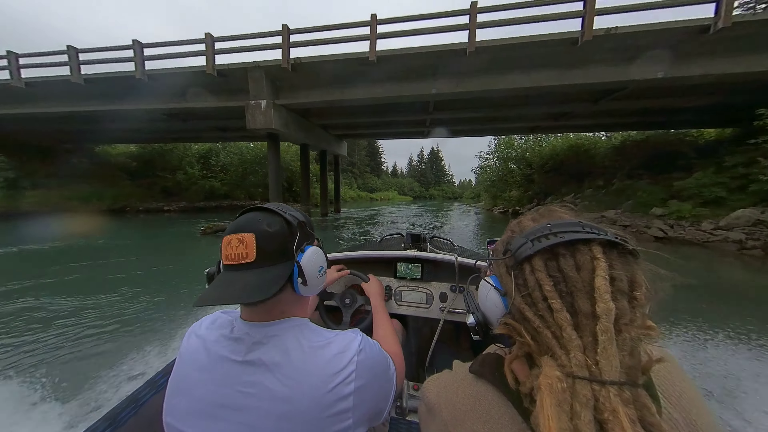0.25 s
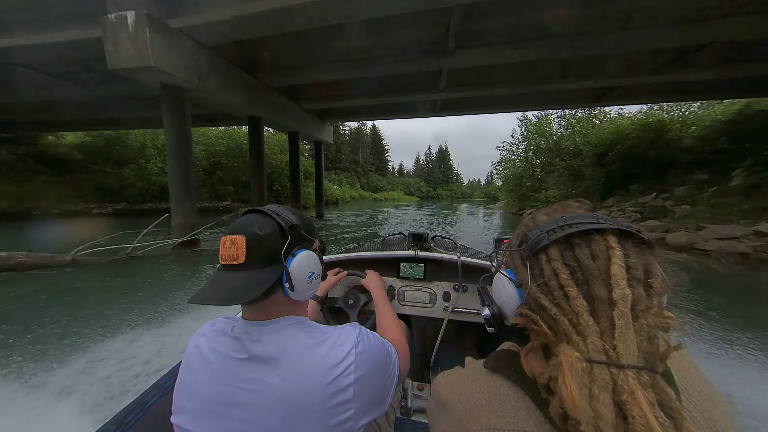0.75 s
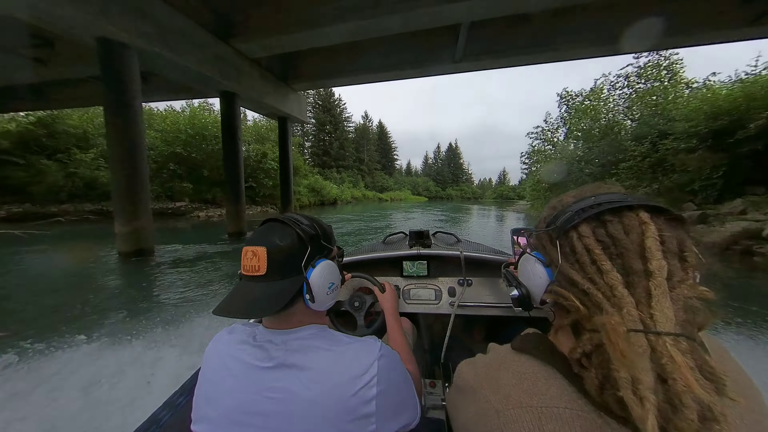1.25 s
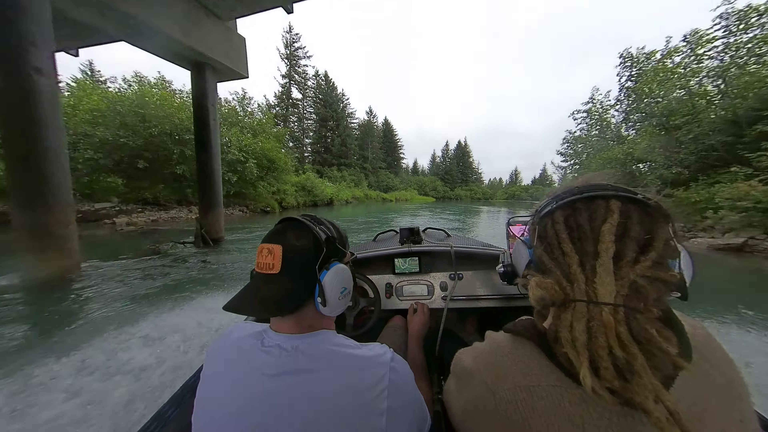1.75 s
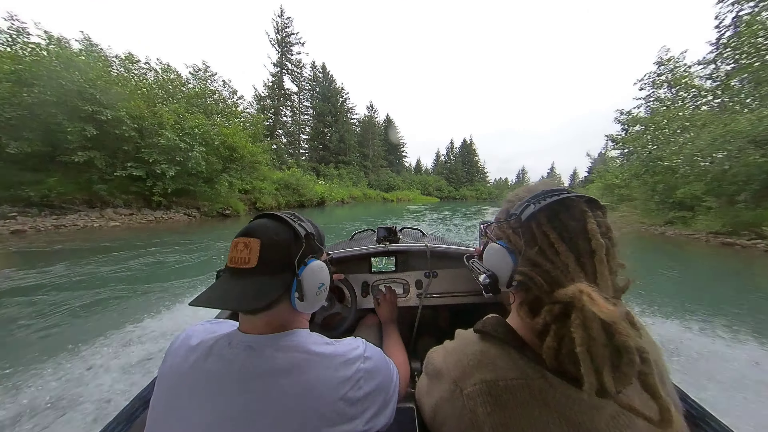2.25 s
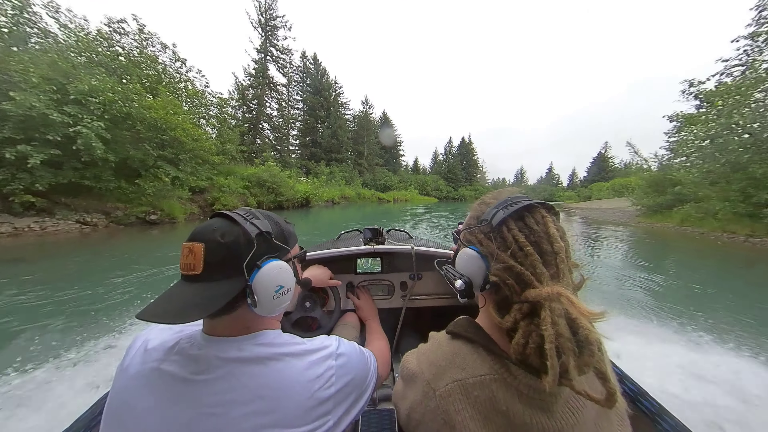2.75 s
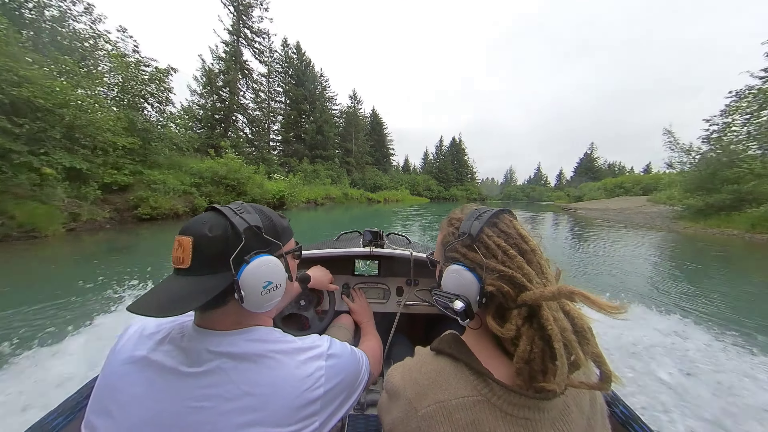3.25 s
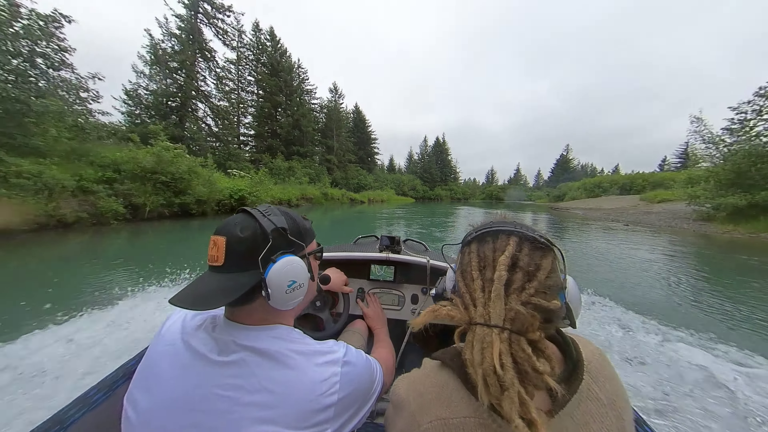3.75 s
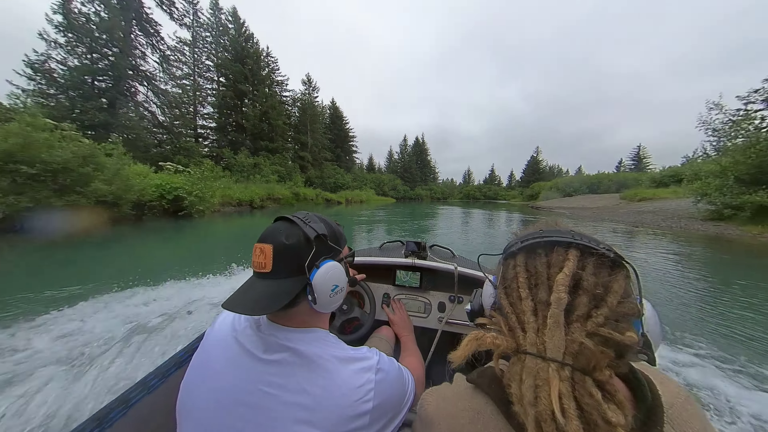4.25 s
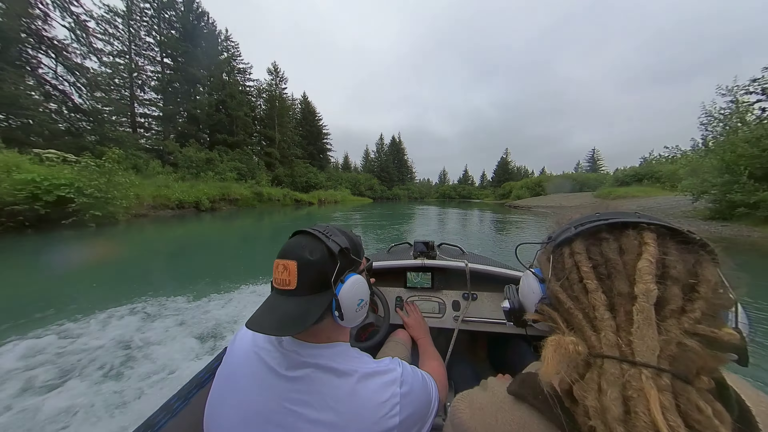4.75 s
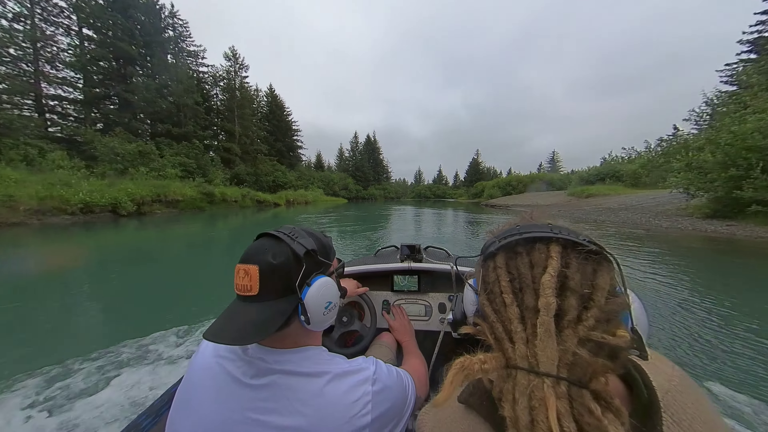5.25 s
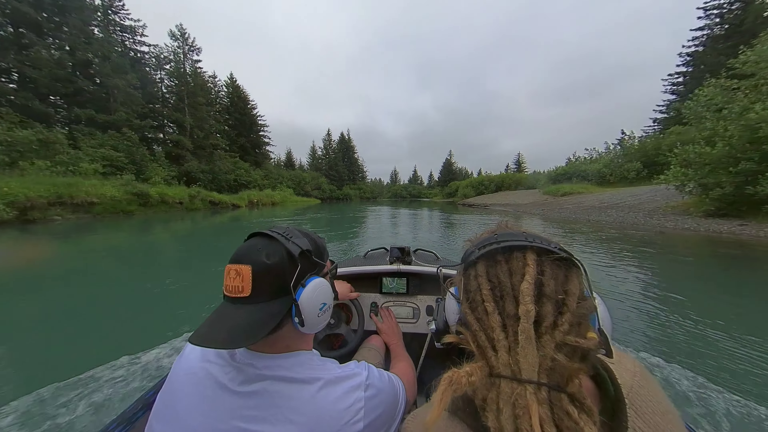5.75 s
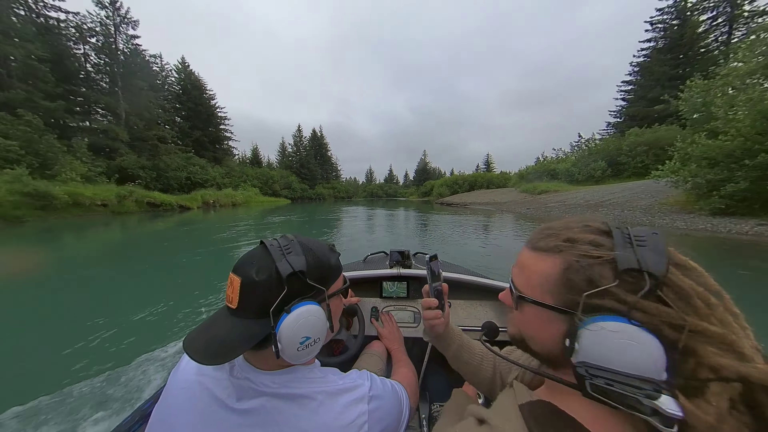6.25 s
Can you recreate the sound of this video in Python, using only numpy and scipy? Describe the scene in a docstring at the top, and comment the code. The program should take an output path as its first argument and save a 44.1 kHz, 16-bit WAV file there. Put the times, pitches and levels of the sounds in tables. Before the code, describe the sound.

On board a small open jet boat at speed on a river, with the microphone behind the seats in the wind. A deep engine drone, around 130 firings a second, runs throughout, with raspy vibrating hull panels, a thin wavering whine from the drive, broad rushing wash and fine hissing spray. From 0 to 0.6 s the pitch sags slightly, and low wind buffeting brings thumps and a cluster of short crackles. More pops come at about 1.0, 1.1, 1.3 to 1.4 and 1.9 s, while the drone flutters and dips. Dull, hard pops strike around 3.1 and 3.25 s. From 3.8 to 4.6 s the engine rises a little, overtones brighten, the jet churns in brief surges and a very faint, high whistle emerges. Afterwards the pitch eases down until about 5.8 s, the spray fades and coarsens, wind calms, and the motor lifts slightly at the end, 6.5 s.

```python
"""Aboard a small jet boat on a river

The microphone rides behind the seats while the boat runs upriver in wind.
The four-cylinder engine is a sine drone with overtones; knocks and gas puffs ring hull panels as a rasp.
The drive whines, as noise and a tone; filtered noise makes the jet's wash, its surges and the spray.
Shaped noise makes wind, thumps and crackles on the microphone; a wavering sine whistles thinly far above."""
import sys
import numpy as np
from scipy import signal
from scipy.fft import rfft, irfft, next_fast_len
from scipy.io import wavfile
from scipy.ndimage import uniform_filter1d, map_coordinates

SR = 44100
rng = np.random.default_rng(int(sys.argv[2]) if len(sys.argv) > 2 else 0)


def store_wav(level_fs):
    """Save 16-bit WAV to argv[1]."""
    pcm = np.round(np.clip(np.atleast_2d(level_fs), -1, 1) * 32767)
    wavfile.write(sys.argv[1], SR, pcm.T.astype(np.int16))


N = 286650

# All table levels are relative; each source adds its own trim.
# engine speed before slight hunting: (time [s], firing rate [Hz])
ENGINE_SPEED = [(0.0, 140.3), (0.17, 141.3), (0.3, 139.6), (0.62, 131), (1.12, 128.7), (1.75, 130.5),
                (1.92, 127.9), (2.45, 127.3), (2.64, 124.5), (2.9, 127.7), (3.45, 126.5), (3.75, 128.7),
                (4.1, 134.9), (4.36, 136), (4.8, 132), (5.02, 128.6), (5.25, 127.7), (5.5, 124.3),
                (5.62, 120.8), (5.84, 119.4), (6.08, 120.3), (6.5, 125.1)]
# exhaust drone at the firing rate: (time [s], level [dB])
DRONE_LEVEL = [(0.0, -21), (0.2, -24), (0.38, -20.5), (0.6, -24.5), (0.72, -17), (1.1, -18), (1.7, -19.5),
               (2.04, -19), (2.2, -16), (2.5, -18), (2.75, -19.5), (3.1, -18.5), (3.3, -16), (3.72, -16.5),
               (3.88, -19.5), (4.5, -18), (5.12, -17), (5.9, -16), (6.22, -17), (6.45, -15)]
# brief deep dips of the drone: (time [s], depth [dB])
DRONE_DIPS = [(0.28, 3.5), (0.54, 19), (1.29, 9), (1.877, 2), (2.02, 7), (2.46, 8), (3.04, 0), (3.13, 4.5),
              (3.62, 2), (4.03, 3.5), (4.23, 4), (4.64, 4.5), (4.76, 4.5), (5.56, 3)]
# exhaust overtones above the wake: (time [s], level [dB])
OVERTONE_LEVEL = [(0.0, -47), (0.7, -39.5), (1.1, -44.5), (1.4, -40), (1.6, -45), (2.2, -43.5), (2.86, -42),
                  (3.15, -47.5), (3.63, -41.5), (3.95, -37), (4.3, -37.5), (4.85, -34.5), (5.17, -39.5),
                  (5.39, -36), (5.8, -39.5), (6.49, -42.5)]
# exhaust lines before the hull colours them: (multiple of the crank rate [1], level [dB])
CRANK_ORDERS = [(3, -1.5), (5, -4), (7, -20), (8, -2), (9, -2), (10, -1), (11, -10), (12, -9), (14, -10),
                (15, -11), (16, -12), (17, -14), (18, -10), (19, -12), (20, -14), (21, -26)]
# second harmonic of the firing: (time [s], level [dB])
SECOND_LEVEL = [(0, -48), (0.8, -43), (1.1, -45.5), (1.7, -48), (2.2, -46.5), (2.8, -44), (3.2, -47),
                (3.4, -52), (3.7, -45), (4.0, -44), (4.16, -33), (4.6, -42), (4.8, -49), (4.95, -39),
                (5.25, -48), (5.6, -37), (6.3, -40.5), (6.45, -52)]
# third harmonic of the firing: (time [s], level [dB])
THIRD_LEVEL = [(0, -51), (1.0, -53), (2.0, -49), (2.25, -40), (2.4, -44), (2.6, -44), (2.85, -39),
               (3.05, -49), (3.45, -54), (3.7, -39.5), (3.92, -43), (4.15, -46), (4.39, -36.5),
               (4.52, -35.5), (4.6, -51), (4.9, -37), (5.1, -45.5), (5.35, -37), (5.55, -43), (5.72, -38),
               (6.15, -39.5), (6.4, -43)]
# engine load, heard as the rasp of the hull: (time [s], level [dB])
ENGINE_LOAD = [(0.0, -38.5), (0.3, -47.5), (0.42, -43), (0.85, -45.5), (1.45, -43.5), (1.8, -44.5),
               (2.3, -43), (2.8, -42), (2.98, -41), (3.14, -45), (3.55, -43), (3.82, -40.5), (3.96, -38.5),
               (4.3, -38.5), (4.52, -37.5), (4.62, -40), (4.9, -40.5), (5.2, -42.5), (5.4, -40),
               (5.78, -45.5), (6.1, -47), (6.3, -42.5), (6.5, -47.5)]
# hull and engine cover resonances: (centre [Hz], width [Hz], level [dB])
HULL_PANELS = [(182, 21.4, -2), (264, 40, -4), (321, 30, -3), (368, 38, -2), (523, 30, 1), (578, 42, -2.5),
               (660, 38, -4.5), (788, 48, -9.5), (1014.6, 40, -5.5), (1064, 30, -12), (1140, 44, -10),
               (1258, 48, -9), (1502, 63, -10), (1636, 79, -15), (1739, 67, -15), (1878, 63, -18),
               (2175, 100, -15.5), (2556, 110, -22.5), (2750, 90, -27), (2935, 130, -26.5),
               (3910, 130, -35.5)]
# whine of the drive: (time [s], level [dB])
WHINE_LEVEL = [(0, -50), (0.1, -41), (0.2, -51), (0.36, -43.5), (0.45, -50), (0.66, -46), (0.75, -53),
               (0.86, -47), (1.15, -46.5), (1.6, -43), (1.95, -51), (2.15, -46), (2.36, -42.5),
               (2.45, -47.5), (2.7, -49), (2.84, -44.5), (3.0, -42), (3.06, -51), (3.6, -50.5), (3.9, -45),
               (4.05, -39.5), (4.35, -45), (4.5, -39.5), (4.62, -46), (5.0, -42.5), (5.15, -48.5),
               (5.38, -41.5), (5.7, -52), (6.5, -52.5)]
# wind buffeting the microphone: (time [s], level [dB])
WIND_LEVEL = [(0.0, -28.5), (0.24, -29.5), (0.34, -34.5), (0.45, -30.5), (0.64, -28.5), (0.8, -34),
              (1.02, -30), (1.22, -32), (1.36, -30), (1.78, -31), (1.98, -33), (2.08, -42), (2.22, -35),
              (2.55, -34.5), (2.68, -35), (2.78, -41), (2.92, -31), (3.18, -29.5), (3.42, -44), (3.6, -34),
              (3.78, -39.5), (3.97, -34), (4.25, -35), (4.6, -36), (5.1, -35), (5.5, -41.5), (5.85, -37.5),
              (6.08, -45.5), (6.5, -47)]
# colour of the buffeting: (frequency [Hz], density [dB per Hz])
BUFFET_COLOUR = [(12, -26.5), (25, -15.5), (45, -0.5), (70, 3), (110, 4), (170, -2.5), (230, -14),
                 (400, -17), (800, -33.5), (2000, -41.5), (5000, -73)]
# hiss of water thrown off the hull: (time [s], level [dB])
SPRAY_LEVEL = [(0.0, -47), (0.14, -50.5), (0.28, -53), (0.4, -48), (0.86, -52), (1.3, -49), (1.42, -48.5),
               (1.55, -48), (1.74, -49), (1.81, -52.5), (1.88, -49.5), (2.1, -46), (2.4, -47.5),
               (2.55, -45), (2.68, -49), (2.8, -45), (3.0, -47), (3.05, -52), (3.58, -51.5), (3.94, -47.5),
               (4.52, -50), (4.58, -54.5), (4.9, -53), (5.08, -58), (5.35, -55), (5.7, -58), (6.12, -59),
               (6.26, -55), (6.5, -60.5)]
# the spray coarsens as the boat turns: (time [s], share of fine spray [0-1])
FINE_SPRAY_SHARE = [(0, 0.97), (3.7, 0.87), (4.5, 0.5), (5.1, 0.3), (6.5, 0)]
# colour of the jet and wake: (frequency [Hz], density [dB per Hz])
WASH_COLOUR = [(100, -17), (200, -3.5), (330, -1.5), (450, -10.5), (640, -3), (790, -9), (890, -17),
               (1050, -10), (1200, -9.5), (1390, -14), (1750, -14), (2000, -20), (2500, -22), (3200, -28),
               (5000, -31.5), (8000, -35.5), (15000, -40)]
# colour of fine spray: (frequency [Hz], density [dB per Hz])
FINE_COLOUR = [(1500, -35), (3500, -12.5), (5000, -7), (6800, -5.5), (8000, -7), (10500, -5), (12000, -1.6),
               (13200, 1), (14200, -3), (15600, -5)]
# colour of coarse spray: (frequency [Hz], density [dB per Hz])
COARSE_COLOUR = [(1500, -30), (3000, -7), (4100, -3), (5000, -7), (6000, -5), (8000, -10.5), (9300, -5.5),
                 (10500, -3.5), (12000, 0), (13200, 1), (14200, -5), (15600, -10)]
# thin whistle: (time [s], pitch [Hz], level [dB])
WHISTLE_LINE = [(0, 13500, -76), (3.6, 13700, -68), (4.0, 13250, -65), (4.5, 13210, -61), (4.8, 13100, -61),
                (5.5, 13250, -67), (6.5, 13370, -70)]
# strongest gusts on the microphone: (time [s], level [dB], flap re level [dB])
GUST_THUMPS = [(0.06, -29, -22), (0.17, -28, -22), (0.24, -24.5, -18), (0.43, -26, -6), (0.61, -26.5, -10),
               (0.98, -27, -20), (1.14, -27.5, -25), (1.36, -26, -11), (1.45, -29, -9), (1.59, -27, -16),
               (1.73, -29.5, -6), (1.88, -28, -2.5), (1.99, -30, -4), (2.42, -26.5, -20), (2.6, -29.5, -6),
               (2.67, -26.5, -24), (2.94, -30, -22), (3.04, -29, -23), (3.15, -27.5, -14),
               (3.63, -31.5, -16), (3.93, -29, -11), (4.04, -30.5, -16), (4.51, -35, -12),
               (5.06, -31.5, -16), (5.85, -36, -19), (6.25, -33.5, -21)]
# colour of a flapping eddy: (frequency [Hz], density [dB per Hz])
FLAP_COLOUR = [(90, -19), (170, 1), (260, -4), (380, -7.5), (600, -15), (1500, -39), (4000, -80)]
# crackles on the microphone: (time [s], level [dB], treble re level [dB], body [Hz], rise [s])
GUST_CRACKLES = [(0.179, -27.5, -31, 1290, 0.0045), (0.245, -27.5, -37, 850, 0.0055),
                 (0.269, -33, -28, 1100, 0.0022), (0.354, -22, -38, 600, 0.005),
                 (0.489, -18, -38, 520, 0.0028), (0.503, -26, -33, 800, 0.0055),
                 (0.513, -26, -23, 860, 0.004), (0.527, -34, -22, 600, 0.002),
                 (0.622, -22, -22, 900, 0.003), (0.633, -29, -29, 700, 0.0058),
                 (0.662, -32, -22, 800, 0.002), (0.997, -19, -19.5, 850, 0.0015),
                 (1.144, -22, -28, 1100, 0.0016), (1.322, -21.5, -26, 840, 0.0034),
                 (1.337, -27, -36, 700, 0.0023), (1.398, -25, -24, 700, 0.0016),
                 (1.872, -28, -35, 696, 0.002), (3.060, -15.5, -45, 400, 0.0015),
                 (3.073, -17, -43, 400, 0.0034), (3.246, -18, -42, 600, 0.003)]
# surges of the jet: (time [s], level [dB], half-width [s])
JET_SURGES = [(1.33, -51, 0.035), (2.83, -49.5, 0.1), (3.95, -50, 0.05), (4.12, -47.5, 0.059),
              (4.28, -45.5, 0.05), (4.42, -44.5, 0.04), (4.52, -42, 0.039)]
# colour of those surges: (frequency [Hz], density [dB per Hz])
CHURN_COLOUR = [(400, -32), (800, -7), (880, -10), (1050, 2), (1400, -6), (1780, 0.5), (2020, -11),
                (2300, -11), (3000, -22), (6000, -36)]
# left-right likeness of the noise: (frequency [Hz], coherence [0-1])
STEREO_LIKENESS = [(1500, 1), (2500, 1), (3500, 0.73), (5500, 0.23), (7500, 0.35), (9000, 0.87),
                   (15000, 0.78)]

TOP_HZ = 15680  # band limit
CRUISE_HZ = 130  # cruising firing rate
CRUISE_TILT_DB, TILT_DB_PER_HZ = -1.5, 0.38  # dB per octave at cruise; its growth per Hz of firing rate
# scale of the random dips; knots per second; growth in dB per dB of wind
DIP_DB, DIP_RATE, DIP_GROWS = 1.0, 24, 0.8
DIP_FALL_S, DIP_RECOVER_S = 0.014, 0.032  # half-widths before and after a deep dip's lowest point
WASH_LOAD_SHARE = 0.88  # share of the wash's level from engine load; the rest follows the spray
THUMP_S = 0.024  # half-width of a thump


def amp(db):
    """Decibels to gain."""
    return 10 ** (np.asarray(db) / 20)


def unit(x):
    """Scale to rms 1."""
    return x / np.sqrt(np.mean(x ** 2) + 1e-20)


def along(points, hz):
    """Read (frequency [Hz], value) points on a log frequency axis."""
    f, v = np.transpose(points)
    return np.interp(np.log(hz + 1), np.log(f + 1), v)


def curves(rows):
    """One value per sample for each column after the time."""
    s, *columns = np.transpose(rows)
    return [np.interp(np.arange(N) / SR, s, column) for column in columns]


def wobble(rate):
    """A smooth random curve, rate knots a second."""
    knots = rng.standard_normal(int(N * rate / SR) + 4)
    return map_coordinates(knots, [np.arange(N) * rate / SR])


def filtered(x, response):
    """x times a complex response of frequency."""
    m = next_fast_len(N + SR // 2)
    return irfft(rfft(x, m) * response(np.fft.rfftfreq(m, 1 / SR)), m)[..., :N]


def rush(spectrum):
    """Coloured noise of rms 1: mono up to 2.5 kHz, spread across left and right above."""
    def mid_side(hz):
        turn = np.arccos(np.clip(along(STEREO_LIKENESS, hz), -1, 1)) / 2
        return amp(along(spectrum, hz)) * np.array([np.cos(turn), np.sin(turn)])

    mid, side = filtered(rng.standard_normal((2, N)), mid_side)
    return unit(np.array([mid + side, mid - side]))


def patchy(x, depth_db):
    """Lay smooth random patches of gain over time and frequency."""
    z = signal.stft(x, nperseg=512)[2]
    field = rng.standard_normal(z.shape[1:])
    field = uniform_filter1d(field, size=7, axis=0)
    field = uniform_filter1d(field, size=6, axis=1)
    patched = signal.istft(z * amp(depth_db * unit(field)), nperseg=512)[1]
    return unit(patched[:, :N])


def hull(hz):
    """Summed panel resonances, with alternating sign."""
    total = 0
    for k, (centre, width, db) in enumerate(HULL_PANELS):
        band = 1j * hz * width / (centre * centre - hz * hz + 1j * hz * width)
        total = total + (-1) ** k * amp(db) * band
    return total


def crank_turns(hunt):
    """Turns of the crank so far: two firings a turn, the speed hunting slightly."""
    firing_hz, = curves(ENGINE_SPEED)
    return np.cumsum(firing_hz / 2 * (1 + hunt * wobble(14))) / SR


def drone(turns, level_db, flutter_db):
    """The deep firing tone, a sine: its short random dips deepen with the wind, and deep dips break it."""
    drone_db, = curves(DRONE_LEVEL)
    wind_db, = curves(WIND_LEVEL)
    t = np.arange(N) / SR
    wind_growth = amp(DIP_GROWS * (wind_db - wind_db.mean()))
    dips_db = DIP_DB * wind_growth * np.clip(wobble(DIP_RATE), 0, 2) ** 2
    for s, depth_db in DRONE_DIPS:
        # quick fall, slower recovery
        half_s = np.where(t < s, DIP_FALL_S, DIP_RECOVER_S)
        dips_db = dips_db + depth_db * np.exp(-((t - s) / half_s) ** 2)
    gain = amp(drone_db + level_db - dips_db + flutter_db * wobble(28))
    return np.sqrt(2) * gain * np.sin(4 * np.pi * turns)


def overtones(turns, level_db, waver_db, smear):
    """The exhaust's overtones, brighter at higher speed; uneven cylinders add the odd crank orders."""
    overtones_db, = curves(OVERTONE_LEVEL)
    firing_hz, = curves(ENGINE_SPEED)
    tilt_db = CRUISE_TILT_DB + TILT_DB_PER_HZ * (firing_hz - CRUISE_HZ)
    grid = np.arange(SR // 20)  # 1 Hz steps
    panels = np.abs(hull(grid))
    lines = np.zeros(N)
    for k, db in CRANK_ORDERS:
        # an overtone swells as it glides across a resonance
        hz = k * firing_hz / 2
        gain = amp(db + tilt_db * np.log2(hz / 380)) * np.interp(hz, grid, panels)
        # the outlet dips in and out of the wake, so level and phase waver
        phase = 2 * np.pi * (round(k) * turns + rng.random()) + smear * k * wobble(25)
        lines += gain * amp(waver_db * wobble(12)) * np.sin(phase)
    return np.sqrt(2) * amp(overtones_db + level_db) * lines


def low_harmonics(turns, level_db, waver_db, smear):
    """The firing's second and third harmonics swell separately: cleaner in calm air, wavering in wind."""
    wind_db, = curves(WIND_LEVEL)
    unrest = 1 + np.tanh((wind_db - wind_db.mean()) / 5)
    lines = np.zeros(N)
    for k, table in enumerate([SECOND_LEVEL, THIRD_LEVEL], 2):
        db, = curves(table)
        phase = 2 * np.pi * (2 * k * turns + rng.random()) + smear * unrest * wobble(25)
        lines += amp(db + waver_db * unrest * np.tanh(wobble(18))) * np.sin(phase)
    return np.sqrt(2) * amp(level_db) * lines


def rasp(turns, uneven, scatter_db, gas_share, level_db):
    """Every firing knocks the hull and lets out a puff of turbulent gas; the panels ring with both."""
    firings = np.flatnonzero(np.diff(np.floor(2 * turns)))
    strong_weak = 1 + uneven * (-1) ** np.arange(len(firings))
    knocks = np.zeros(N)
    knocks[firings] = strong_weak * amp(scatter_db * rng.standard_normal(len(firings)))
    # gas pulses once a firing and once a crank turn
    pulse = np.exp(0.28 * np.cos(4 * np.pi * turns) + 0.24 * np.cos(2 * np.pi * turns))
    puffs = rng.standard_normal(N) * pulse
    share = np.clip(gas_share, 0, 1)
    drive = np.sqrt(1 - share) * unit(knocks) + np.sqrt(share) * unit(puffs)
    load_db, = curves(ENGINE_LOAD)
    return amp(load_db + level_db + 1.1 * wobble(26)) * unit(filtered(drive, hull))


def whine(turns, centre_hz, width_hz, wander_hz, tone_share, level_db):
    """A sharp drive resonance sings: a wandering, fading tone in narrow noise throbbing with the crank."""
    whine_db, = curves(WHINE_LEVEL)
    shaking = rng.standard_normal(N) * (1 + 0.5 * np.cos(2 * np.pi * turns))
    band = unit(filtered(shaking, lambda hz: 1 / (1 + ((hz - centre_hz) / width_hz) ** 4)))
    phase = 2 * np.pi * np.cumsum(centre_hz + wander_hz * wobble(40)) / SR
    tone = unit(np.sin(phase) * amp(5.9 * np.tanh(wobble(20))))
    share = np.clip(tone_share, 0, 1)
    return amp(whine_db + level_db) * (np.sqrt(share) * tone + np.sqrt(1 - share) * band)


def wind(level_db, gust_db, lump_db):
    """Eddies pass over the microphone in gusts and smaller lumps, with lulls between them."""
    buffet_db, = curves(WIND_LEVEL)
    eddies_db = gust_db * np.tanh(wobble(15)) + lump_db * wobble(28)
    return amp(buffet_db + level_db) * unit(amp(eddies_db) * rush(BUFFET_COLOUR))


def water(wash_db, spray_db):
    """Wash churns harder with load and thrown water; fine or coarse spray fizzes in patches off the chines."""
    load_db, = curves(ENGINE_LOAD)
    hiss_db, = curves(SPRAY_LEVEL)
    fine = np.clip(curves(FINE_SPRAY_SHARE)[0], 0, 1)
    flow_db = WASH_LOAD_SHARE * load_db + (1 - WASH_LOAD_SHARE) * hiss_db
    churn_db = 1.0 * wobble(24)
    flicker_db = 0.7 * wobble(35) + 0.4 * wobble(14)
    wash = amp(flow_db + wash_db + churn_db) * patchy(rush(WASH_COLOUR), depth_db=2.5)
    drops = np.sqrt(fine) * rush(FINE_COLOUR) + np.sqrt(1 - fine) * rush(COARSE_COLOUR)
    spray = amp(hiss_db + spray_db + flicker_db) * patchy(drops, depth_db=2.5)
    return wash + spray


def whistle(width_hz):
    """A narrow whistle high above the engine, made fuzzy by random level and pitch."""
    pitch_hz, db = curves(WHISTLE_LINE)
    phase = 2 * np.pi * np.cumsum(pitch_hz + width_hz * wobble(60)) / SR
    return np.sqrt(2) * amp(db) * wobble(2 * width_hz) * np.sin(phase)


def thumps(level_db):
    """Single big eddies swell and pass over the microphone within hundredths of a second, flapping higher up."""
    t = np.arange(N) / SR
    swell, flap = np.zeros((2, N))
    for s, db, flap_db in GUST_THUMPS:
        eddy = amp(db + level_db) * np.exp(-((t - s) / THUMP_S) ** 2)
        swell += eddy
        flap += amp(flap_db) * eddy
    return swell * rush(BUFFET_COLOUR) + flap * rush(FLAP_COLOUR)


def crackles(level_db, t60, snap_db, snap_t60, snap_hz):
    """The hardest eddies swell and break in a short pop, dull or bright, with a sharper snap on top."""
    t = np.arange(SR // 10) / SR
    hz = np.fft.rfftfreq(len(t), 1 / SR)
    snap_ratio = hz / snap_hz
    snap_colour = 1j * snap_ratio / (1 + 1.2j * snap_ratio - snap_ratio ** 2) ** 3
    out = np.zeros(N)
    for s, db, treble_db, body_hz, rise_s in GUST_CRACKLES:
        def burst(life):
            """Spectrum of noise that rises, then falls 60 dB in life seconds."""
            envelope = np.minimum(t / rise_s, 1) * amp(-60 * np.maximum(t - rise_s, 0) / life)
            return rfft(envelope * rng.standard_normal(len(t)))

        body_ratio = hz / body_hz
        pop_colour = 1j * body_ratio / (1 + 1j * body_ratio) ** 3 / (1 + 1j * hz / 3500) ** 2
        pop = amp(level_db) * burst(t60) * pop_colour
        snap = amp(snap_db + treble_db) * burst(snap_t60) * snap_colour
        out[round(s * SR):][:len(t)] += amp(db) * irfft(pop + snap, len(t))
    return out


def surges(level_db):
    """Now and then the jet churns up for a moment: a brief swell of coloured, flickering noise."""
    t = np.arange(N) / SR
    swell = sum(amp(db) * np.exp(-((t - s) / half_s) ** 2) for s, db, half_s in JET_SURGES)
    return amp(level_db + 2.5 * wobble(70)) * swell * rush(CHURN_COLOUR)


def scene():
    """Engine, whistle and crackles in the middle; wind and water spread in the treble."""
    turns = crank_turns(hunt=0.0012)
    engine = drone(turns, level_db=-3.0, flutter_db=0.69)
    engine = engine + overtones(turns, level_db=-2.2, waver_db=2.3, smear=0.08)
    engine = engine + low_harmonics(turns, level_db=-2.7, waver_db=3.0, smear=0.5)
    engine = engine + rasp(turns, uneven=0.19, scatter_db=1.0, gas_share=0.83, level_db=0.5)
    engine = engine + whine(turns, centre_hz=1252, width_hz=52, wander_hz=15, tone_share=0.35, level_db=-2.8)
    air = wind(level_db=1.0, gust_db=2.0, lump_db=-0.5) + thumps(level_db=-0.5)
    air = air + crackles(level_db=12.5, t60=0.032, snap_db=15.5, snap_t60=0.0086, snap_hz=2860)
    river = water(wash_db=-0.5, spray_db=-1.5) + surges(level_db=0.0)
    return engine + air + river + whistle(width_hz=110)


def record(dry):
    """The camera's microphone keeps nothing above its band limit."""
    return filtered(dry, lambda hz: hz < TOP_HZ)


dry = scene()
out = record(dry)
store_wav(out)
```